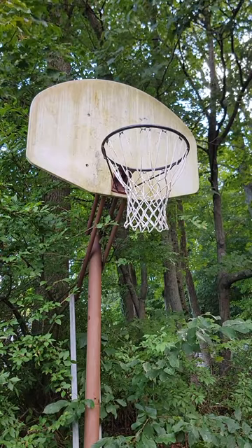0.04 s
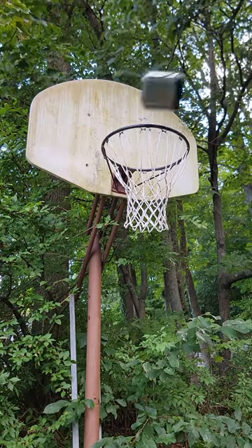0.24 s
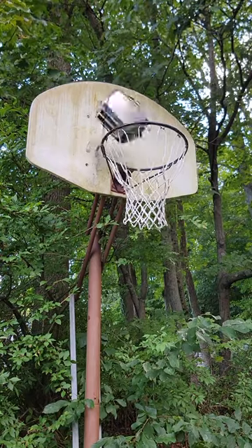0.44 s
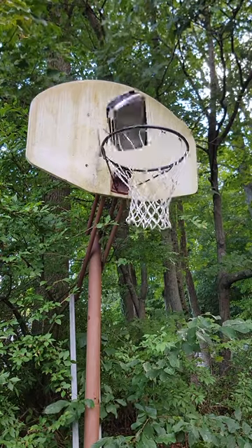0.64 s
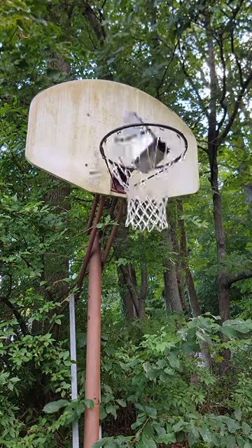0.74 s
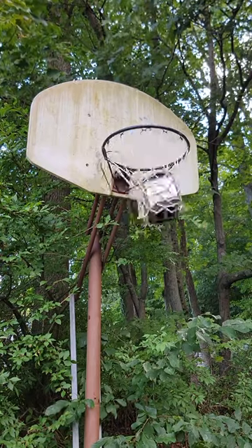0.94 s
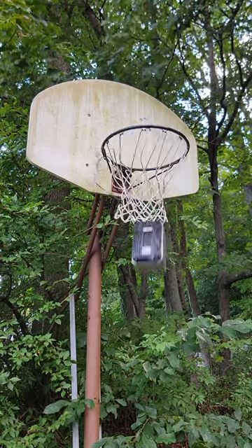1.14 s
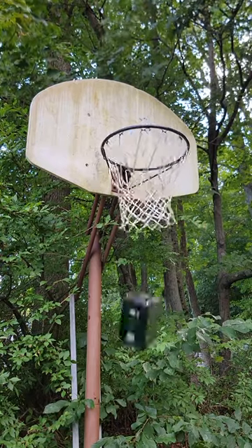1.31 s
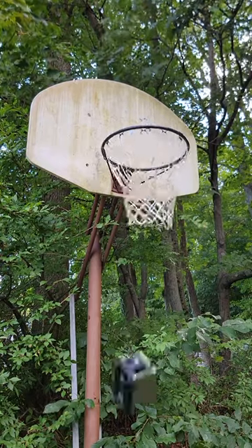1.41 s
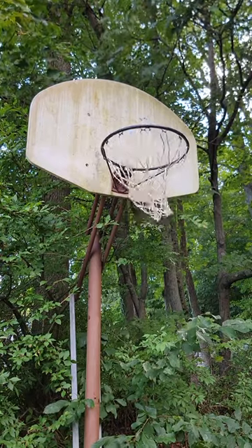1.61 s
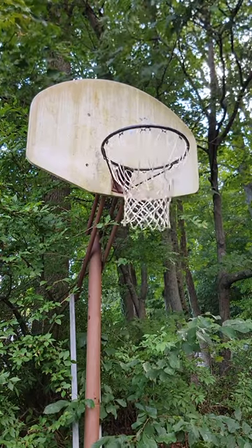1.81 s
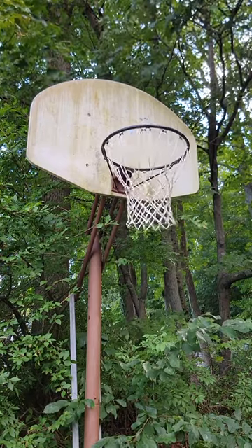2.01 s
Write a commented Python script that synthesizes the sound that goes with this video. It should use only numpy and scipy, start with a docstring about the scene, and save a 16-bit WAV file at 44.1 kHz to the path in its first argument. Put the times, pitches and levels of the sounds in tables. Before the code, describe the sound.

Sharp sheet-metal bangs and loose-part rattles from a toaster striking an outdoor hoop, booming board underneath, short pause with light ticks, then ground crashes; faint tree echoes, insects and far traffic, loudest blows clipping.

```python
"""Sharp metal bangs and a loose rattle: a sheet-metal toaster is thrown at an outdoor hoop among trees.
It bangs the board and rim, drops through the net and crashes on the ground, heard by a microphone pair.
Rattles are shaped noise, panels and board are decaying modes, and sparse echoes return from the trees.
Behind are a near cricket's pulsed whistle, and noise for far traffic, leaves and a chorus of far insects."""
import sys
import numpy as np
from scipy import signal
from scipy.fft import rfft, irfft
from scipy.io import wavfile

SR = 44100
rng = np.random.default_rng(int(sys.argv[2]) if len(sys.argv) > 2 else 0)


def store_wav(level_fs):
    """Save 16-bit WAV to argv[1]."""
    pcm = np.round(np.clip(np.atleast_2d(level_fs), -1, 1) * 32767)
    wavfile.write(sys.argv[1], SR, pcm.T.astype(np.int16))


def elevation(decibels):
    """Turn decibel levels (scalar or array-like) into linear amplitude ratios."""
    levels = np.asarray(decibels, float)
    return 10 ** (levels / 20)


N = 90801  # samples

# Blows, scrapes and rattles of the toaster: start_s, upper_mids_db, lows_db, treble_db, t60_s (before
# the band's own factor), rise_s (at least 0.0003), lower_mids_db
BLOWS = [(0.022, -20.5, -39, -16, 0.29, 0.0021, -21.5), (0.246, -28.5, -38, -28.5, 0.29, 0.00041, -28),
         (0.391, -5.5, -6.5, -5, 0.35, 0.0016, -2.5), (0.496, -14, -24, -11, 0.43, .001, -20),
         (.545, -5, -41, -4.5, 0.13, 0.0022, -11), (0.727, -4, -15, -4.5, 0.18, 0.0019, -3.5),
         (1.275, -24, -51, -27.5, 0.27, 0.00031, -31), (1.789, -17, -42, -18, 0.56, 0.0012, -28.5),
         (1.8023, -6.5, -10.5, -4, 0.17, 0.0032, -15), (0, -22, -26.5, -25.5, 0.34, 0.00028, -26),
         (0.304, -35, -29.5, -37, 0.018, 0.00091, -26), (0.37, -16, -23, -17.5, 0.081, 0.021, -24),
         (0.413, -8, -5, -4.5, 0.37, 0.0054, -6), (0.601, -44.5, -22, -36, 0.15, 0.0097, -19.5),
         (0.787, -20.5, -30.5, -23.5, 0.34, 0.0015, -37.5), (0.88, -37, -48, -47, 1, .002, -28.5),
         (0.896, -25, -34.5, -27, 0.46, 0.038, -26), (1.337, -25, -55, -21.5, 0.18, 0.0021, -29.5),
         (1.447, -28.5, -29.5, -32, 0.13, 0.0027, -26.5), (1.818, -9.5, -45, -14, 0.17, 0.016, -15.5)]
# Edges between lows, lower mids, upper mids and treble: edge_hz
BAND_EDGES_HZ = (514, 1287, 5200)
# Colour of the casing's rattle: pitch_hz, relative_level_db (per Hz)
CASING_COLOUR = [(59, -43), (100, -3.5), (282, 0), (684, -9), (1090, -13), (1370, -9.5), (2480, -11.5),
                 (5320, -18.5), (6710, -13.5), (9820, -26), (13800, -20.5), (15600, -22)]
# Single strikes that ring the casing: start_s, level_db, centre_hz of the modes woken, damping (times t60)
STRIKES = [(.027, -15.5, 2500, 0.47), (.245, -13.5, 1020, 0.24), (.304, -33, 782, 0.41),
           (.3925, -20, 2080, 0.34), (.547, -3, 1150, 1.3), (.7285, 0.5, 1510, 0.78),
           (.731, -7.5, 430, 1.1), (.762, -17, 970, 0.73), (.821, -21, 1250, 0.76),
           (.8805, -18.5, 1400, 0.58), (.8995, -15.5, 810, .4), (.905, -20, 630, 1.2), (.917, -16, 700, .6),
           (.927, -27, 635, 1.7), (1.183, -37.5, 3170, 0.61), (1.2755, -13.5, 3500, 0.15),
           (1.276, -17.5, 1660, 0.28), (1.2755, -9.5, 5300, 0.064), (1.34, -27, 1450, 0.19),
           (1.342, -21, 3260, 0.33), (1.364, -26.5, 760, 0.82), (1.378, -29.5, 750, 2.5),
           (1.369, -26, 3250, 0.27), (1.449, -31, 470, 1.03), (1.788, -13.5, 3300, 0.51),
           (1.788, -12, 6500, 0.87), (1.808, -10.5, 370, 0.69), (1.809, -5, 2240, 1.2),
           (1.822, -4, 2620, 2.7), (1.833, -10, 990, 0.43)]
# Modes of the casing panels: pitch_hz, relative_level_db, t60_s (before damping)
PANELS = [(370, 8.5, 0.08), (499.5, 4.5, 0.11), (664, -2.5, 0.11), (790, 2, 0.16), (995, 1, 0.094),
          (1176.5, -3.5, 0.19), (1363, 1.4, 0.22), (1517, 1, 0.088), (1714, 5.5, 0.039), (1888.5, 1, 0.085),
          (2153, -5, 0.2), (2515, -3.5, 0.23), (2577, -8, 0.13), (2822, 1.5, 0.1), (3153, -3, 0.15),
          (3500, -1.5, 0.11), (5060, 5, 0.016), (7230, 4, 0.026), (8630, 6.5, .03)]
RATTLES_PER_S, RATTLE_SPREAD_DB, RATTLE_S = 600, 3.5, .002
RATTLE_BED = 1.8  # steady part under the ticks, which have rms 1
TREBLE_T60_TIMES, UPPER_MIDS_T60_TIMES = 0.76, 0.9
FLOOR_HZ = 171  # rattles and clanks are cut below this


def toaster():
    """Loose parts tick on the casing in dense bursts, each band at its own level; strikes ring the panels."""
    ticks = random_knocks(RATTLES_PER_S, RATTLE_SPREAD_DB, 5)
    grain = evened(signal.lfilter([1], [1, -np.exp(-1 / (RATTLE_S * SR))], ticks)) + RATTLE_BED
    hz = np.fft.rfftfreq(N, 1 / SR)
    below_low, below_mid, below_treble = (1 / (1 + (hz / edge) ** 4) for edge in BAND_EDGES_HZ)
    bands = (  # column in BLOWS, band gain, factor on t60
        (1, below_treble - below_mid, UPPER_MIDS_T60_TIMES),
        (2, below_low, 1.0),
        (3, 1 - below_treble, TREBLE_T60_TIMES),
        (6, below_mid - below_low, 1.0))
    out = np.zeros((2, N))
    for column, band, t60_times in bands:
        spectra = ports(rng.standard_normal((2, N)), band * elevation(read(CASING_COLOUR, hz)))
        noise = evened(irfft(spectra, N) * grain)
        power = sum((elevation(row[column]) * envelope(row[0], row[4] * t60_times, row[5])) ** 2 for row in BLOWS)
        level = np.sqrt(power)
        out += noise * level
        if column == 1:
            out += clanks(level)
    cut = signal.butter(4, FLOOR_HZ, "high", fs=SR, output="sos")
    return signal.sosfilt(cut, out) + struck(STRIKES, PANELS)


CLANKS_PER_S, CLANK_DB, CLANK_SPREAD_DB = 700, -13, 5
CLANK_DAMP, CLANK_LOW_HZ = 0.38, 700  # factor on t60; panels below this pitch clank weakly


def clanks(level):
    """Loose parts knock single panels at random while the toaster shakes; each knock rings one mode."""
    knocks = elevation(CLANK_DB) * random_knocks(CLANKS_PER_S, CLANK_SPREAD_DB, 4) * level
    panel = rng.integers(0, len(PANELS), N)
    t, out = np.arange(SR // 8) / SR, np.zeros((2, N))
    for k, (hz, db, t60) in enumerate(PANELS):
        gap = half_gap(hz) * np.array([[1], [-1]])
        decay = elevation(db - 60 * t / (t60 * CLANK_DAMP)) / (1 + (CLANK_LOW_HZ / hz) ** 4)
        tone = decay * np.sin(2 * np.pi * hz * t + gap) * np.minimum(t * hz / SWELL_TURNS, 1)
        out += signal.oaconvolve((knocks * (panel == k))[None], tone, axes=1)[:, :N]
    return out


# Dry cracks: start_s
SNAP_TIMES = [.2455, .4975, .5455, .7285, 1.2755, 1.278, 1.7885]
# The same cracks: level_db
SNAP_LEVELS = [-13, -7, -4, -1, -7, -11, -14]
SNAP_S, SNAP_HZ = .0003, 4000  # decay time constant; pitch at the start, falling


def snaps():
    """Dry cracks: a cosine that drops in pitch and dies within a few milliseconds."""
    t, out = np.arange(N) / SR, np.zeros(N)
    for start, db in zip(SNAP_TIMES, SNAP_LEVELS):
        since = np.maximum(t - start, 0)
        decay = np.exp(-since / SNAP_S)
        out += elevation(db) * (t >= start) * decay * np.cos(2 * np.pi * SNAP_HZ * since * decay)
    return np.array([out, np.roll(out, 6)])  # right side 6 samples later


# Panels that the slide sets singing: row number in PANELS, from 0
SINGING = [5, 10, 12]
SKID_START_S, SKID_END_S, SKID_START_DB, SKID_END_DB = .372, .392, -32, -19
SKID_WIDTH_HZ = 40


def skid():
    """The casing slides on the board before the bang: friction swells in a few wavering panel tones."""
    t = np.arange(N) / SR
    db = np.interp(t, (SKID_START_S, SKID_END_S), (SKID_START_DB, SKID_END_DB))
    db = db - 600 * np.maximum(t - SKID_END_S, 0)  # falls 600 dB a second after the slide
    swell = elevation(db) * np.clip((t - SKID_START_S) / 0.0018, 0, 1)
    tones = sum(wavering(SKID_WIDTH_HZ) * np.sin(2 * np.pi * PANELS[k][0] * t) for k in SINGING)
    return swell * tones


# Blows on the board: start_s, level_db, centre_hz of the modes woken, damping (times t60)
THUMPS = [(.396, -19, 250, 0.76), (.408, -3.5, 133, 1.5), (.415, -19.5, 80, 1.4), (.443, -0.5, 271, 1.05),
          (.44, -3, 68, .7), (.49, -12, 308, 0.75), (.53, -17.5, 88, 0.42), (.56, -17, 133, 1.7),
          (.729, -12.5, 61, 0.63), (.76, -17.5, 81, 1.3), (.8, -17.5, 157.5, 3.2), (1.035, -24, 220, 1.9),
          (1.809, -20.5, 200, .6)]
# Modes of board and pole: pitch_hz, relative_level_db, t60_s (before damping)
BOARD_MODES = [(52, -3, 0.2), (78, 3, 0.44), (133, 6, 0.35), (226.8, 1.5, 0.14), (258, -4.5, 0.14),
               (299.3, 1, 0.14), (390, 7, 0.086), (526, -1, .06)]


def board():
    """Board and pole boom in their low modes as the board shakes on its bracket."""
    return struck(THUMPS, BOARD_MODES)


TREES_DB, TREES_T60_S, TREES_GAP_S, TREES_LOW_HZ = -15, 0.49, 0.015, 250


def trees(hits):
    """Sparse echoes from trunks and leaves: random taps that fade in, then decay, without the lows."""
    t = np.arange(SR // 2) / SR
    taps = rng.choice([-1., 1.], (2, SR // 2)) * (rng.random((2, SR // 2)) < .05)
    taps = taps * elevation(-60 * t / TREES_T60_S) * np.minimum(t / TREES_GAP_S, 1)
    taps = taps / np.linalg.norm(taps[0])
    bright = signal.lfilter(*signal.butter(2, TREES_LOW_HZ, "high", fs=SR), hits)
    return elevation(TREES_DB) * signal.oaconvolve(bright, taps, axes=1)[:, :N]


# Loudness of the near cricket: time_s, level_db
CRICKET_LEVEL = [(0, -40), (.37, -50), (1.05, -47), (2.06, -49.5)]
CRICKET_HZ, CRICKET_WIDTH_HZ = 8065, 72
PULSES_PER_S, PULSE_TURN, PULSE_SHARPNESS = 46.59, -.51, 1.2  # turn: phase in cycles


def cricket():
    """One near cricket trills: a high whistle in pulses of slightly wavering strength, leaning left."""
    t = np.arange(N) / SR
    pulse = (.5 + .5 * np.cos(2 * np.pi * (PULSES_PER_S * t + PULSE_TURN))) ** PULSE_SHARPNESS
    tone = evened(pulse * wavering(CRICKET_WIDTH_HZ) * np.sin(2 * np.pi * CRICKET_HZ * t))
    return tone * elevation(np.interp(t, *np.transpose(CRICKET_LEVEL))) * elevation(np.array([[1.5], [-1.5]]))


# Colour of the open air: pitch_hz, relative_level_db (per Hz)
AIR_COLOUR = [(15, -49.5), (25, -18), (32, -7.5), (86, -3.5), (107, -6.5), (126, -11), (160, -17),
              (216, -17.5), (1720, -36.5), (4290, -39), (5930, -40), (6970, -30.5), (7970, -28.5),
              (8640, -59), (15600, -53)]
# Gain of the far insects, above 6 kHz, over that colour: time_s, level_db
CHORUS_LEVEL = [(0, 12), (.37, 13.5), (1.05, 7), (2.06, 9)]
AIR_DB = -35  # rms before the chorus is raised


def air():
    """Far traffic rumble, leaf hiss and far insects: coloured noise, its top raised by a moving level."""
    hz, t = np.fft.rfftfreq(N, 1 / SR), np.arange(N) / SR
    spectra = ports(rng.standard_normal((2, N)), elevation(read(AIR_COLOUR, hz)))
    whole = irfft(spectra, N)
    chorus = irfft(spectra * (hz > 6000), N) * (elevation(np.interp(t, *np.transpose(CHORUS_LEVEL))) - 1)
    return elevation(AIR_DB) * (whole + chorus) / np.std(whole)


REACH_OCTAVES, SCATTER_DB, DETUNE = .55, 1.5, .015  # detune: share of the pitch
SWELL_TURNS = 1.2  # cycles in which a mode swells up
LONGEST_S, LONGEST_TURNS = .08, 14  # a mode's t60 is at most this time plus this many cycles


def struck(rows, modes):
    """Strikes wake the modes near their centre, detuned by dents; each mode has a phase gap at the pair."""
    t, out = np.arange(SR // 2) / SR, np.zeros((2, N + SR))
    rest_hz, mode_db, t60 = np.array(modes).T[:, :, None]
    gap = half_gap(rest_hz)
    luck = rng.standard_normal((len(rows), 2, len(modes), 1))
    for (start, db, centre_hz, damp), (scatter, bend) in zip(rows, luck):
        hz = rest_hz * (1 + DETUNE * bend)
        near_db = -6 * (np.log2(hz / centre_hz) / REACH_OCTAVES) ** 2 + SCATTER_DB * scatter
        ring_s = np.minimum(t60 * damp, LONGEST_S + LONGEST_TURNS / hz)
        decay = elevation(db + mode_db + near_db - 60 * t / ring_s)
        shape = decay * np.minimum(t * hz / SWELL_TURNS, 1)
        at = round(start * SR)
        for side, sign in enumerate((1, -1)):
            out[side, at:at + len(t)] += (shape * np.sin(2 * np.pi * hz * t + sign * gap)).sum(0)
    return out[:, :N]


LINGER_DB, LINGER_TIMES = -23, 2.35  # weak slower rattle after each blow: level, factor on t60


def envelope(start, t60, rise):
    """Short linear rise, then a fast decay over a weaker, slower one."""
    t = np.maximum(np.arange(N) / SR - start, 0)
    rise, t60 = max(rise, 3e-4), max(t60, .01)
    after = np.maximum(t - rise, 0)
    fast = elevation(-60 * after / t60)
    slow = elevation(LINGER_DB - 60 * after / (t60 * LINGER_TIMES))
    return np.minimum(t / rise, 1) * (fast + slow)


def random_knocks(per_s, spread_db, most):
    """Single-sample knocks at random times, a few of them much stronger (at most `most` spreads)."""
    size = elevation(spread_db * np.minimum(rng.exponential(1, N), most))
    return size * (rng.random(N) < per_s / SR)


WAVER = .3  # rms share of the level


def wavering(width_hz):
    """A level that wanders around 1: low-passed noise, faster for a larger width."""
    r = np.exp(-np.pi * width_hz / SR)
    return 1 + WAVER * evened(signal.lfilter([1], [1, -r], rng.standard_normal(N)))


# Likeness of the two microphones: pitch_hz, likeness (1 same, 0 unrelated, -1 opposite)
SAME = [(60, 0.99), (130, 0.99), (290, 0.79), (640, -0.29), (1410, -0.35), (3100, -0.19), (6820, -0.032),
        (15000, -0.11)]
# Balance of the two microphones: pitch_hz, left_minus_right_db
LEAN = [(60, -2.5), (240, -1.5), (950, -0.5), (3770, -1), (15000, 4.5)]
TURNED, TURNED_HZ = 0.8, 3000  # part of the unlike sound that is a quarter turn off; it fades above this


def ports(pair, gain):
    """Two unrelated sounds become the spectra of a microphone pair, alike and balanced per pitch."""
    a, b = rfft(pair, axis=1) * gain
    hz = np.fft.rfftfreq(N, 1 / SR)
    same, lean = np.clip(read(SAME, hz), -1, 1), elevation(read(LEAN, hz) / 2)
    turned = TURNED / np.sqrt(1 + (hz / TURNED_HZ) ** 2)
    unlike = turned * 1j * a + np.sqrt(1 - turned ** 2) * b
    return np.array([a * lean, (same * a + np.sqrt(1 - same ** 2) * unlike) / lean])


def half_gap(hz):
    """Half the phase gap that gives a tone its likeness at the two microphones."""
    return np.arccos(np.clip(read(SAME, hz), -1, 1)) / 2


def read(points, hz):
    """A table read on a log-frequency axis."""
    f, value = np.transpose(points)
    return np.interp(np.log(hz + 1), np.log(f + 1), value)


def evened(x):
    """Rms 1."""
    return x / np.sqrt(np.mean(x ** 2) + 1e-20)


def scene():
    """All sources at the microphone pair; only the toaster and board echo from the trees."""
    hits = toaster() + board() + snaps() + skid()
    return hits + trees(hits) + air() + cricket()


def top_cut(x):
    """Nothing passes above the cut-off."""
    return signal.sosfilt(signal.butter(12, 15780, fs=SR, output="sos"), x)


DRIVE_DB = -5.5


def record(dry):
    mix = np.clip(dry * elevation(DRIVE_DB), -1, 1)
    return top_cut(mix)


dry = scene()
out = record(dry)
store_wav(out)
```